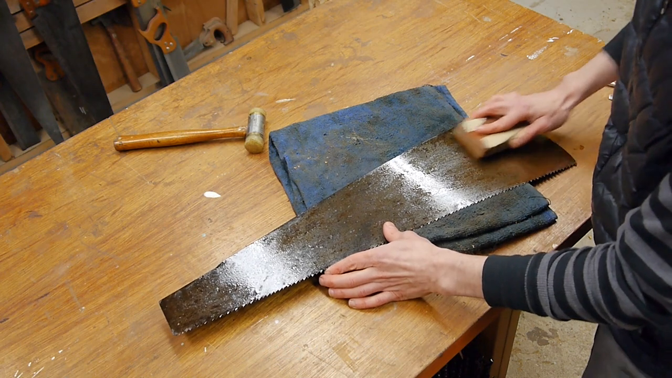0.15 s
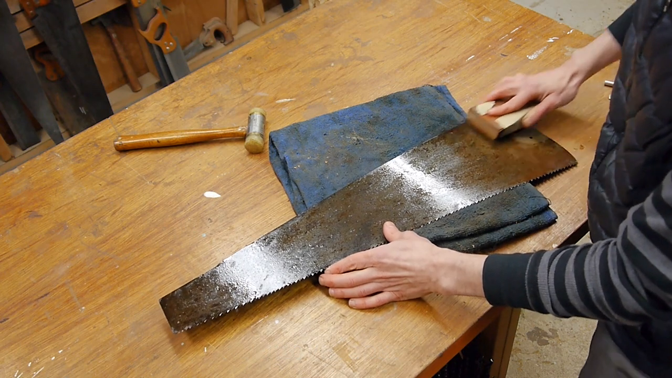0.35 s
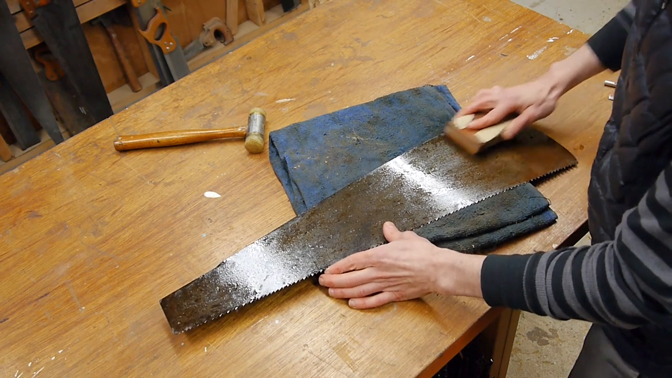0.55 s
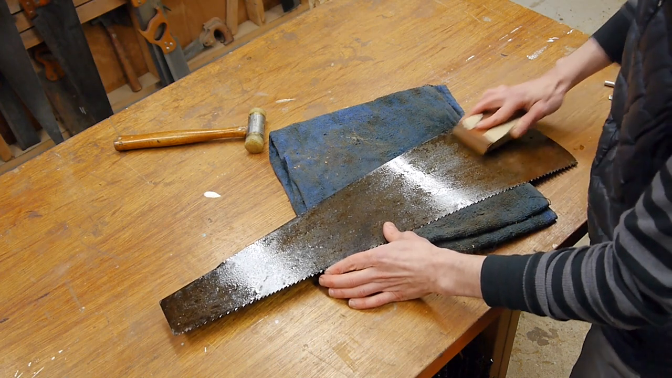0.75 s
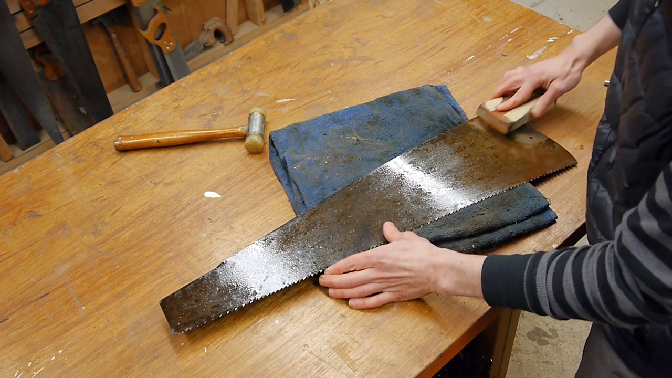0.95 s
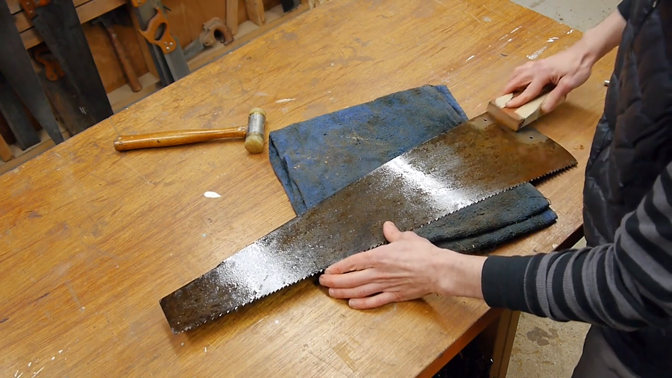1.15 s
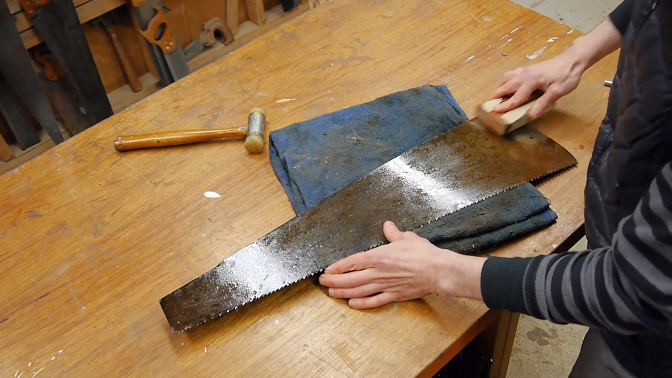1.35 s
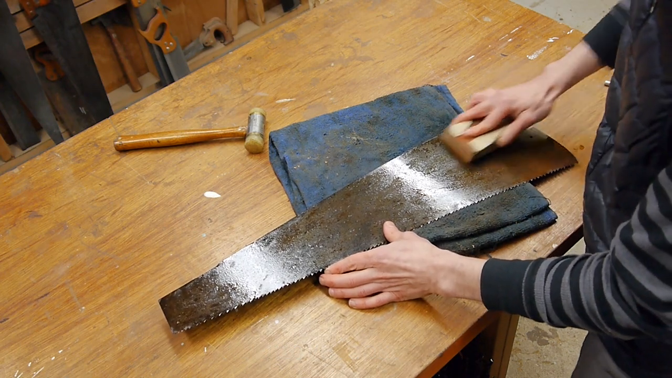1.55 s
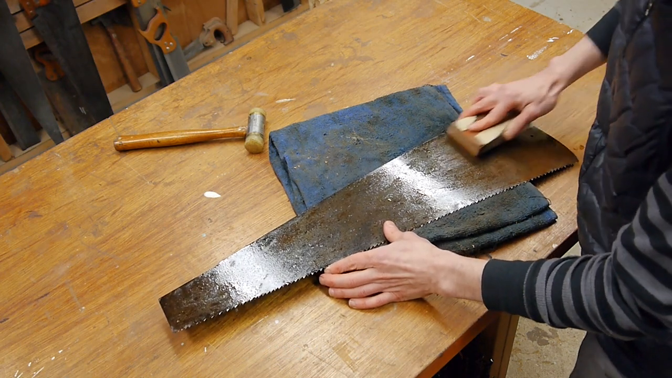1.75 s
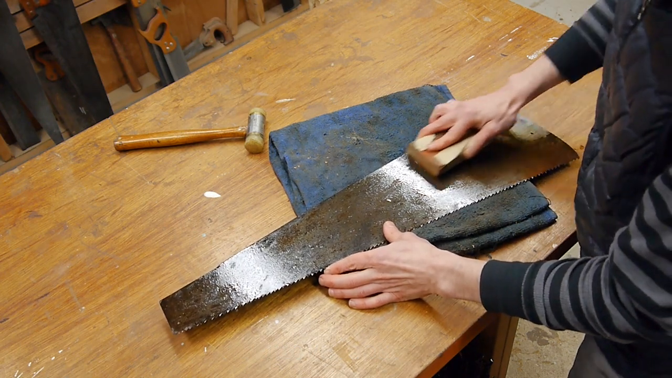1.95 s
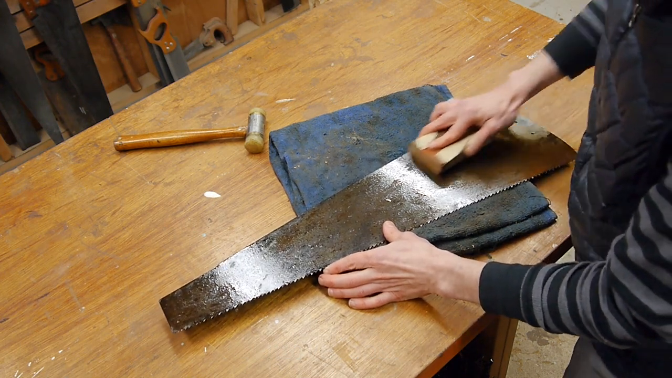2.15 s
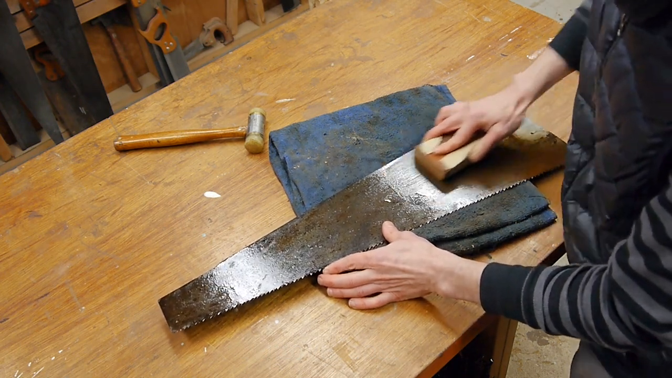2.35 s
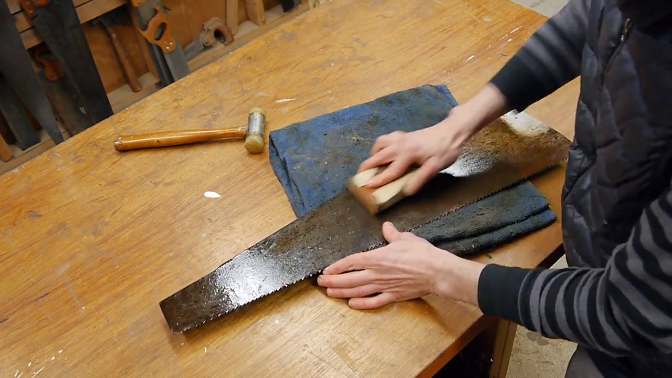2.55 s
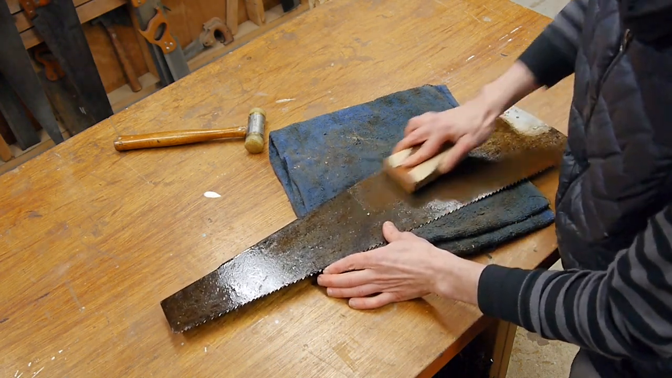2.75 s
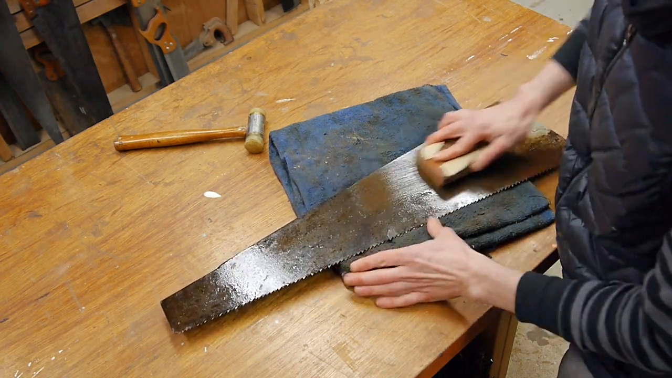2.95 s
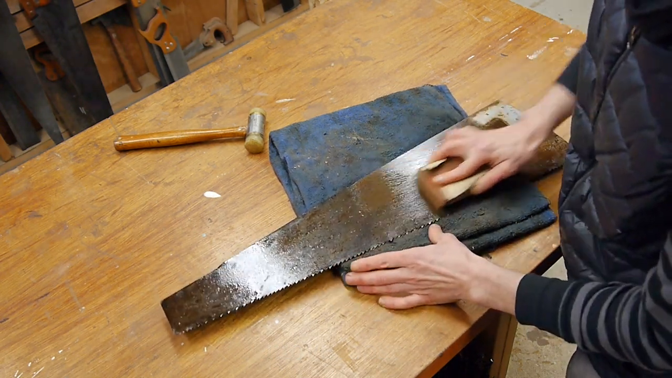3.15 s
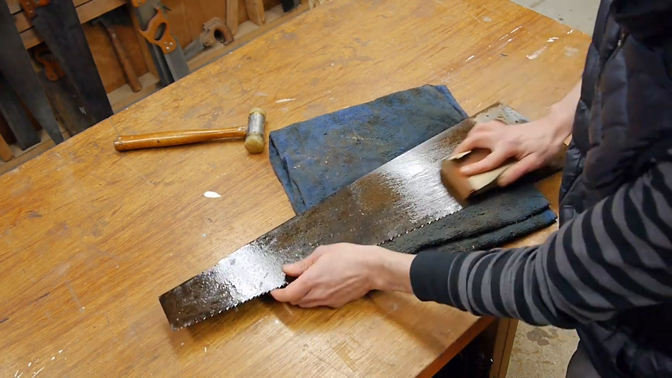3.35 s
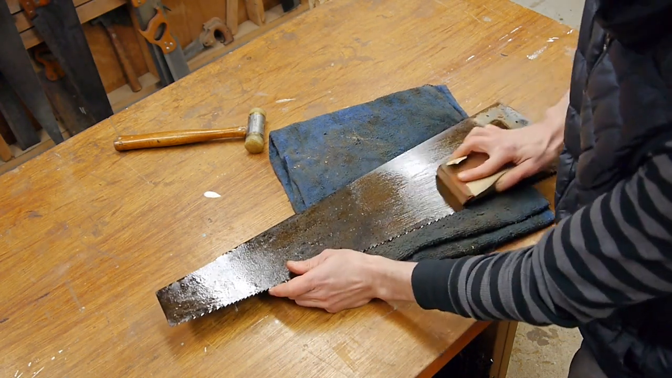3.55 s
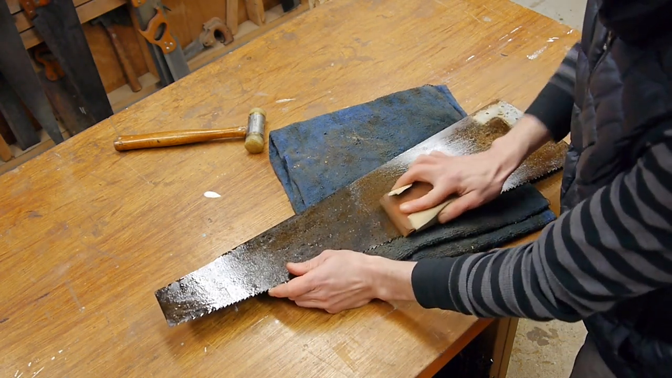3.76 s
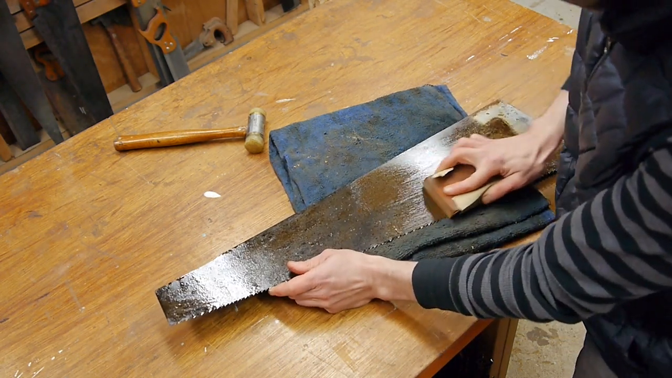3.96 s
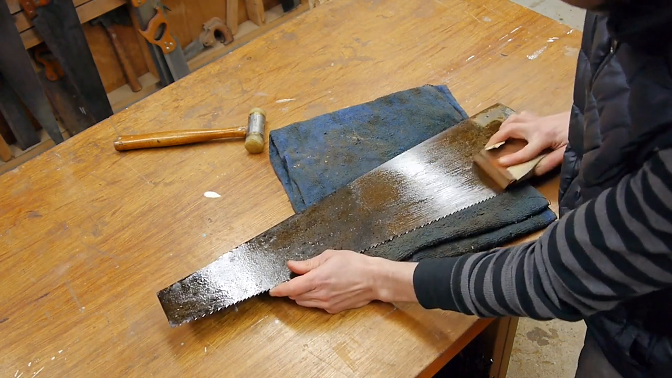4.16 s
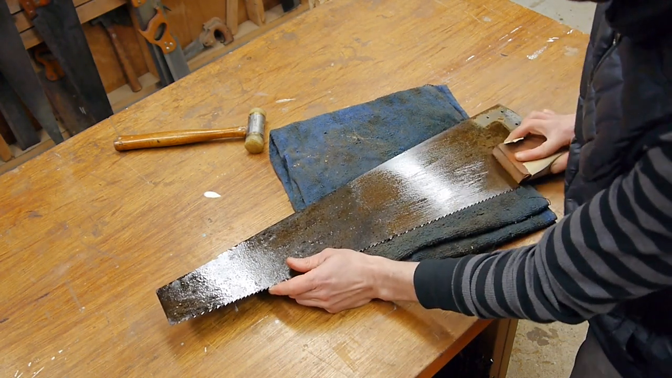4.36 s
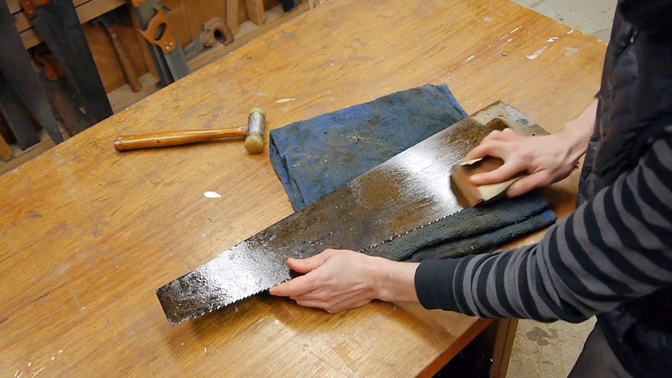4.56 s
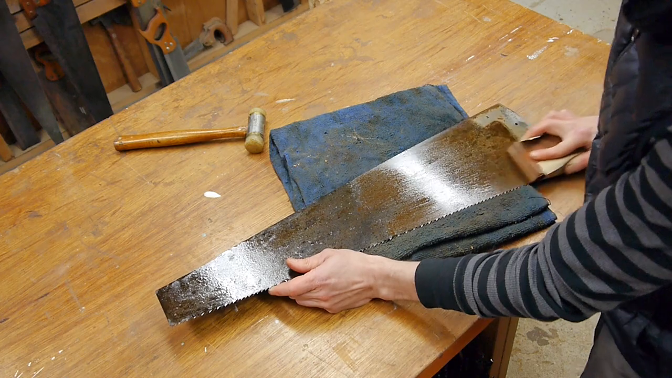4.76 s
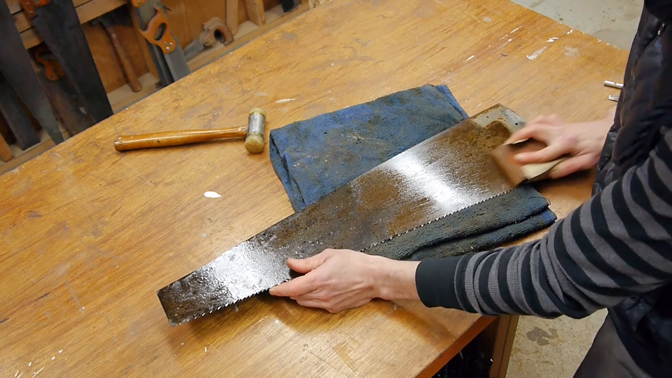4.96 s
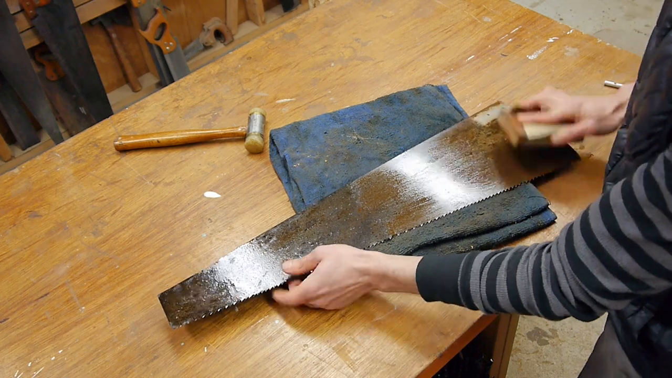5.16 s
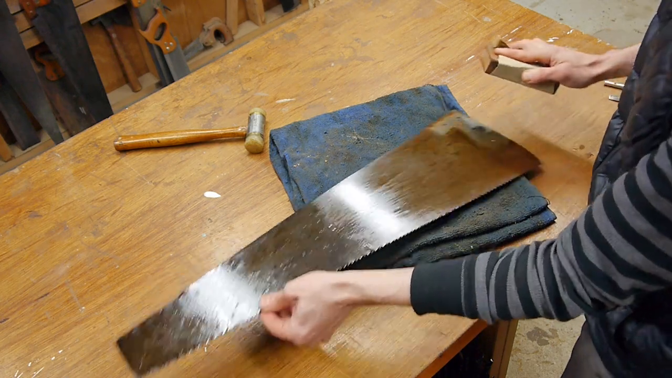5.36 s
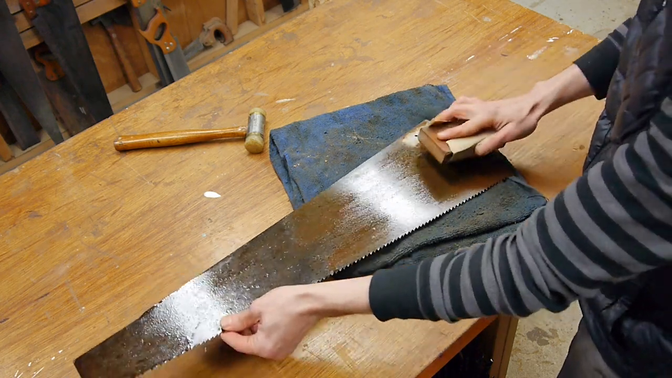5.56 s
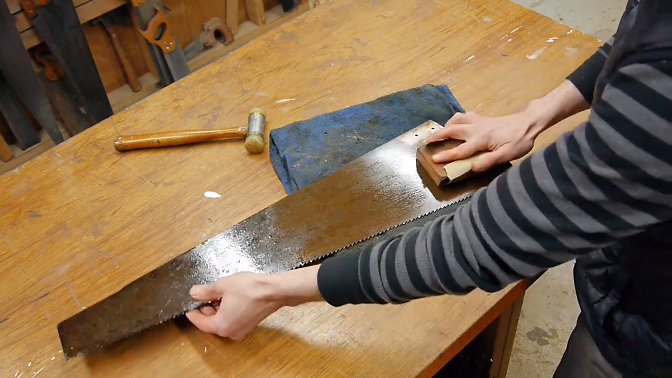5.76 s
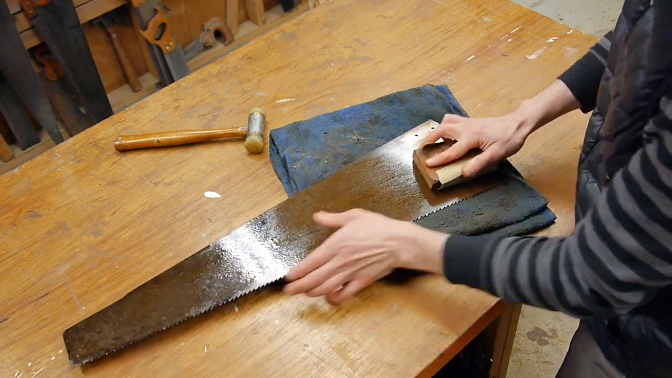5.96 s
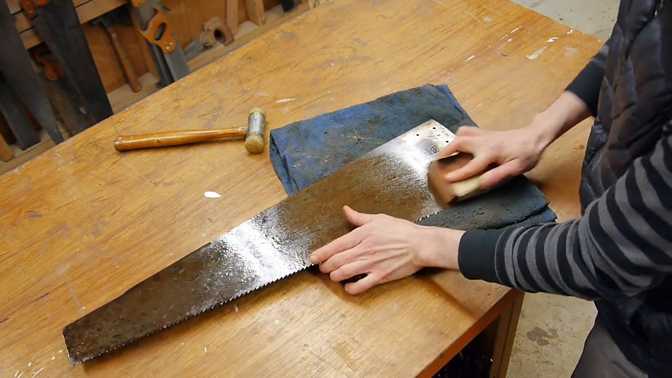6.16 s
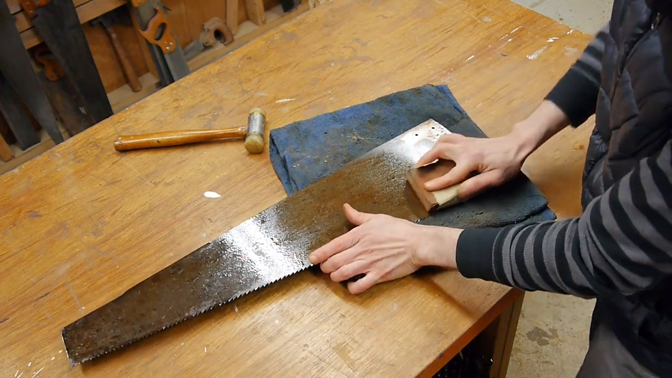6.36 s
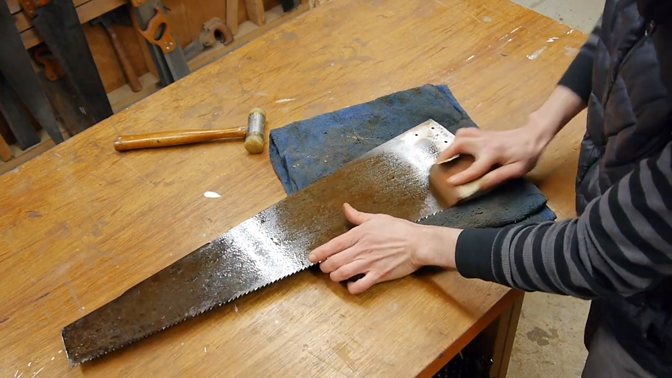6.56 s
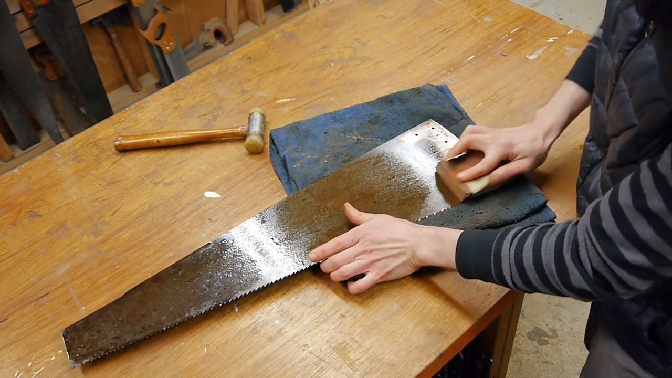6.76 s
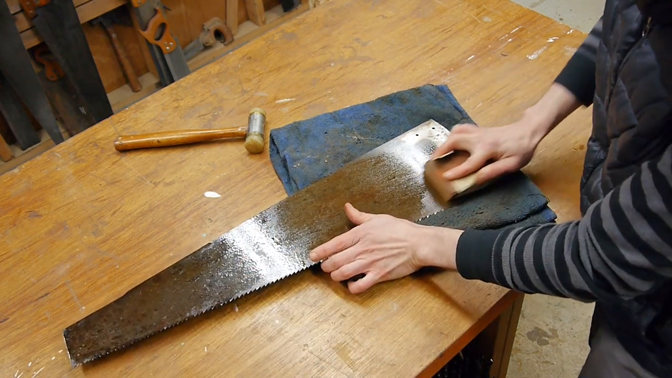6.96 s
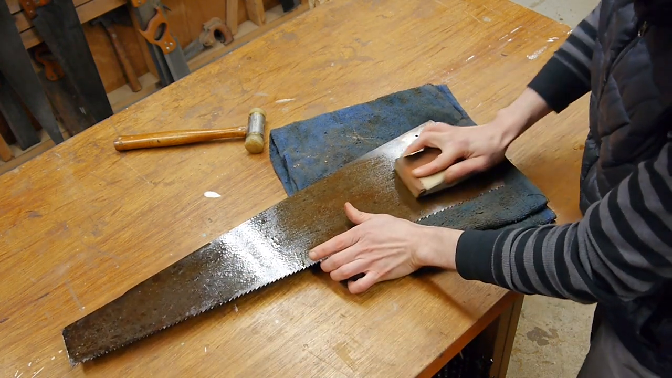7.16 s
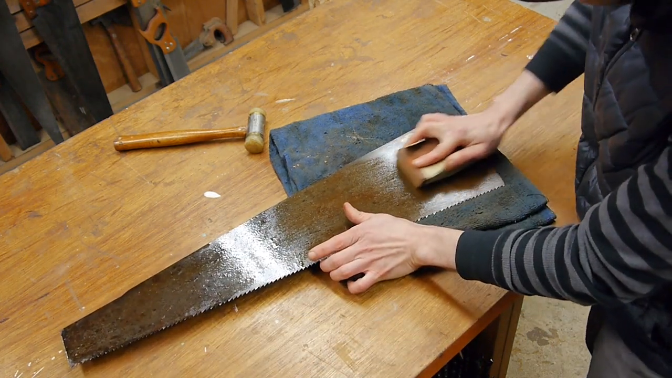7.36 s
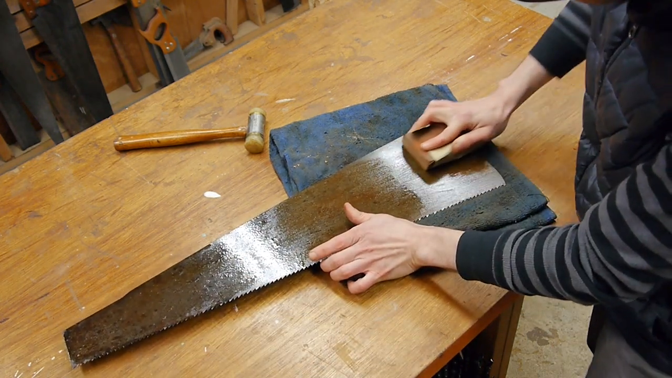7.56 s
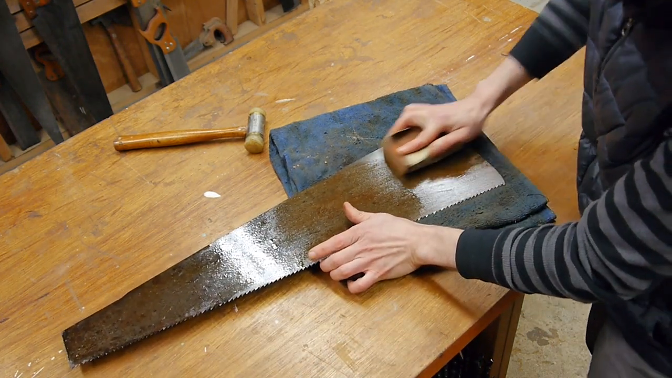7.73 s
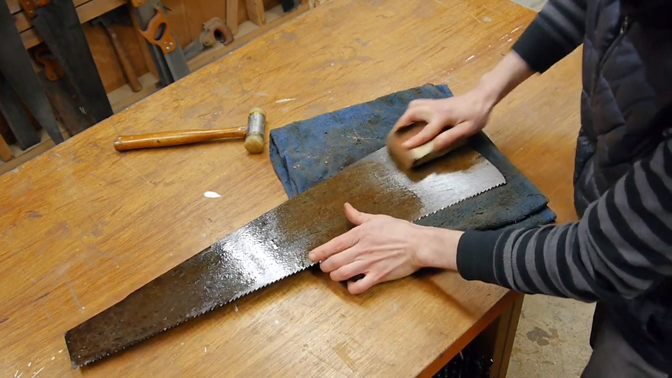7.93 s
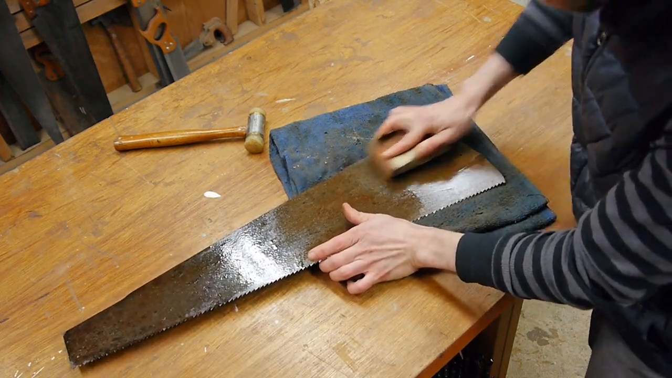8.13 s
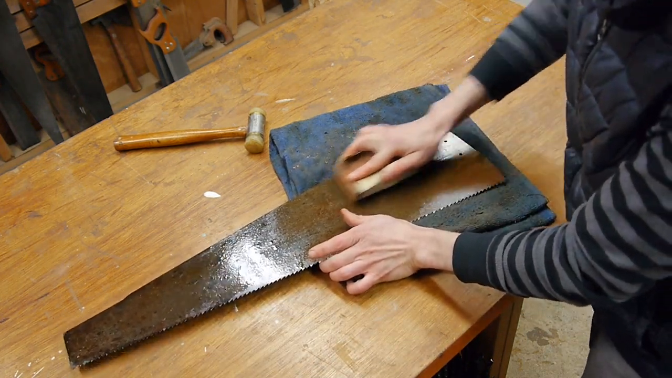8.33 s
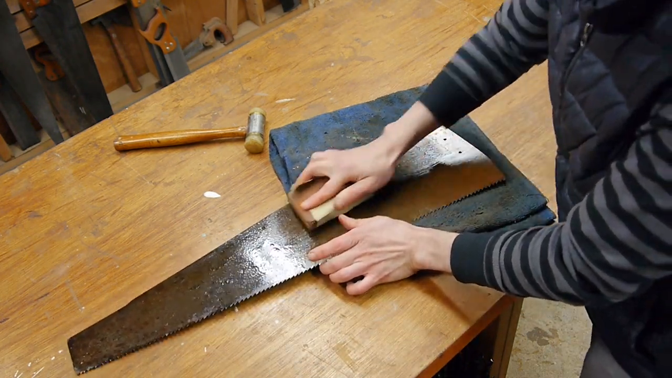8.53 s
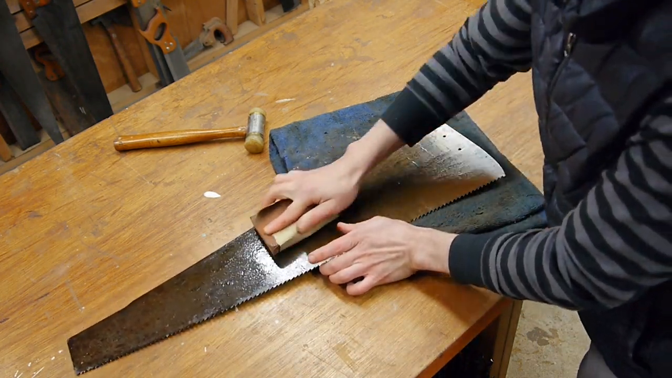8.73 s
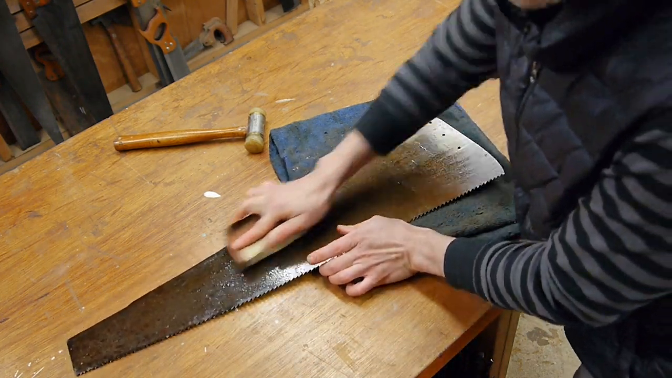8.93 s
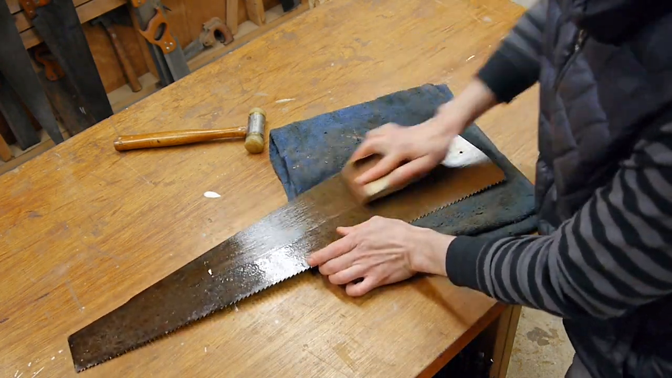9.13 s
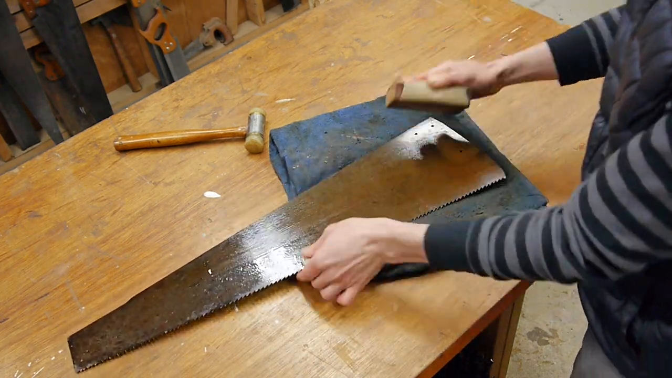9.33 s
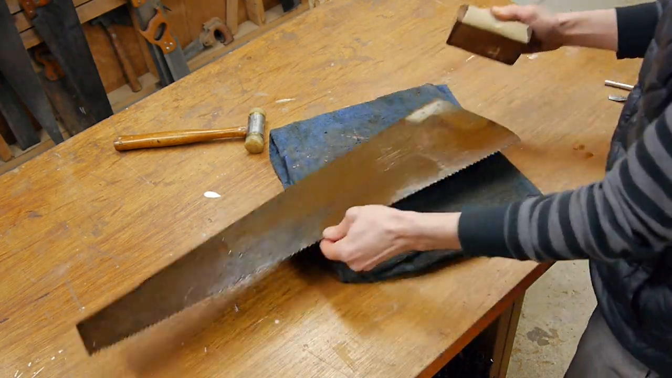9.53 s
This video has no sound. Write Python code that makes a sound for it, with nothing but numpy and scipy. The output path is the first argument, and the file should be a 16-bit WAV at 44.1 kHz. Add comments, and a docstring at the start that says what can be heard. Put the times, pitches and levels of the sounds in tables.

```python
"""First a sanding block rubs to and fro over a steel saw blade on a workbench: noise coloured by grit and
plate, swelling with each stroke. Its knocks ring the wooden bench. In a pause the blade is dragged, chatters
and claps down on the wood, as decaying modes and noise bursts. After two seconds the scene runs at double
pace, in its last moment at triple pace: colours, bench modes and hum move up in step, and the stereo picture
changes. Two channels at the bench also take in a small workshop's answer, air, rumble, hum and whine."""
import sys
import numpy as np
from scipy import signal
from scipy.fft import rfft, irfft, next_fast_len
from scipy.io import wavfile
from scipy.ndimage import uniform_filter1d, map_coordinates

SR = 44100
rng = np.random.default_rng(int(sys.argv[2]) if len(sys.argv) > 2 else 0)


def to_wav(s):
    """Save 16-bit WAV."""
    ch = np.atleast_2d(s).T  # columns
    pcm = np.round(np.clip(ch, -1, 1) * 32767)  # PCM
    wavfile.write(sys.argv[1], SR, pcm.astype(np.int16))


N = 427329

# where the pace rises: double_pace_start_s, triple_pace_start_s
PACE_STARTS = (2.092, 9.595)
# hand strokes, each lasting until the next turn or lift: turn_s, top_level_db, place_of_top (0-1)
STROKES = [(-0.07, -23.5, 0.49), (0.052, -25.5, 0.53), (0.184, -25.5, 0.5), (0.317, -25.5, 0.54),
           (0.471, -26, 0.53), (0.605, -26.5, 0.55), (0.752, -31, 0.5), (0.877, -28.5, 0.57),
           (1.029, -30.0, 0.43), (1.139, -30.5, 0.56), (1.261, -30.0, 0.3), (1.386, -30.5, 0.56),
           (1.506, -33, 0.59), (1.597, -26.5, 0.52), (1.735, -29.5, 0.37), (1.882, -27.0, 0.64),
           (2.021, -29.5, 0.3), (2.14, -34.5, 0.67), (2.209, -36.0, 0.44), (2.274, -29, 0.71),
           (2.351, -32.5, 0.3), (2.416, -28.0, 0.58), (2.504, -30.5, 0.37), (2.577, -28.5, 0.58),
           (2.647, -32.5, 0.4), (2.715, -31, 0.52), (2.781, -33.5, 0.43), (2.85, -31, 0.59),
           (2.925, -32, 0.44), (3.067, -28.5, 0.42), (3.172, -29, 0.37), (3.267, -30, 0.53),
           (3.354, -29, 0.4), (3.451, -29.5, 0.56), (3.545, -28.5, 0.45), (3.629, -28, 0.49),
           (3.708, -27.0, 0.42), (3.78, -29.0, 0.52), (3.841, -29.0, 0.5), (3.905, -28.5, 0.54),
           (3.963, -29.5, 0.51), (4.028, -28.5, 0.5), (4.093, -30.5, 0.22), (4.214, -36.5, 0.74),
           (4.267, -31.5, 0.61), (4.354, -32, 0.35), (4.432, -34.5, 0.52), (4.5, -31.5, 0.45),
           (4.565, -32.5, 0.59), (4.624, -31.0, 0.5), (4.687, -33, 0.43), (4.743, -26.5, 0.54),
           (4.822, -30, 0.4), (4.879, -28.0, 0.55), (4.941, -28.5, 0.49), (5.002, -26.5, 0.53),
           (5.068, -28, 0.43), (5.136, -34.5, 0), (5.956, -44, 0.8), (6.01, -35.5, 0.46),
           (6.074, -30, 0.52), (6.146, -31, 0.56), (6.206, -30.5, 0.53), (6.265, -29.5, 0.55),
           (6.326, -31.5, 0.53), (6.384, -31.5, 0.52), (6.439, -30, 0.49), (6.499, -31, 0.56),
           (6.556, -29, 0.46), (6.612, -32.0, 0.5), (6.667, -30.5, 0.48), (6.72, -33.5, 0.56),
           (6.775, -31.5, 0.53), (6.827, -33.0, 0.52), (6.886, -32.5, 0.49), (6.94, -31.5, 0.51),
           (6.998, -32.5, 0.54), (7.056, -32.5, 0.45), (7.112, -34.5, 0.48), (7.172, -33, 0.38),
           (7.23, -35, 0.5), (7.284, -32, 0.34), (7.342, -34.5, 0.54), (7.399, -32.5, 0.42),
           (7.46, -33, 0.53), (7.52, -33, 0.4), (7.584, -33, 0.49), (7.647, -32.5, 0.43),
           (7.706, -32.5, 0.5), (7.768, -33, 0.45), (7.83, -32.5, 0.54), (7.891, -31.5, 0.53),
           (7.954, -31, 0.49), (8.021, -31, 0.45), (8.091, -30.5, 0.5), (8.164, -29.5, 0.52),
           (8.267, -32.0, 0.5), (8.359, -30.5, 0.54), (8.444, -30.5, 0.43), (8.525, -30.5, 0.56),
           (8.614, -29, 0.5), (8.692, -29, 0.56), (8.804, -28.5, 0.47), (8.903, -26, 0.57),
           (9.066, -27.5, 0.22)]
# the block leaves the blade: lift_s
LIFTS = (5.225, 9.285)
# colour along the blade: time_s, low_ring_over_strokes_db, treble_over_strokes_db
BLADE_COLOUR = [(0, -11.5, -7), (.7, -11.5, -4.5), (1.2, -9.5, -4.5), (2.08, -10.5, -2.5), (2.12, -8, 1),
                (2.95, -8, -0.5), (3.15, -10, 6), (3.55, -11, 3), (3.95, -8.5, -2), (4.3, -9, 6),
                (4.65, -5, 1), (5, -9.5, 2.5), (5.2, -6, -2), (6, -8, 0), (6.75, -7.5, 0.5), (7.3, -9.5, 2),
                (7.95, -11, -1.5), (8.5, -11.5, 1), (8.9, -12, 0), (9.1, -8.5, -0.5), (9.25, -17, 1)]
# sandpaper on steel, at natural pace: pitch_hz, level_db (per Hz)
GRIT = [(24, -57), (40, -24), (54, -52.5), (98, -28.5), (219, -18.5), (379, -8), (452, -12.5), (625, -5.5),
        (1080, -8.5), (4180, -7), (4500, -6), (5230, -4.5), (9520, 4.5), (13500, -3), (15700, -13.5)]
# resonances of the rubbed blade, at double pace: pitch_hz, width_hz, level_db
PLATE = [(527, 37, 0.5), (775, 18, -10), (1284, 31, -4.5), (1895, 97, 0), (2472, 150, -2.5),
         (3170, 160, -7.5), (4630, 76, 2.5), (5820, 620, -6.5), (7000, 130, -2), (7860, 250, -7),
         (8270, 260, 0), (9410, 160, -6.5), (10240, 570, -1.5), (11500, 170, -5)]
# stereo picture at natural pace: heard_pitch_hz, left_right_likeness (0-1)
LIKENESS_NATURAL = [(60, 0.85), (130, 0.59), (290, 0.85), (640, 0.9), (1410, 0.65), (3100, 0.66),
                    (6820, 0.96), (15000, 1)]
# stereo picture at the faster paces: heard_pitch_hz, left_right_likeness (0-1)
LIKENESS_FAST = [(60, 0.4), (130, 0.64), (290, 0.8), (640, 0.9), (1410, 0.94), (3100, 0.8), (6820, 0.69),
                 (15000, 0.88)]
# balance of the rubbing: time_s, left_over_right_db
BALANCE = [(0.0, 0.0), (1.97, 0.0), (3.31, 0), (5.05, 0.0), (8.13, 0), (9.12, 0.5), (9.3, -0.5)]
# the block rocks and knocks the bench: start_s, mode_level_db, deep_part_db, bright_part_db, tick_level_db
KNOCKS = [(.061, -48, 21, 0, -48), (.085, -46, 16, -6, -50), (.115, -49, 18, -8, -51),
          (.414, -48, -8, 2, -47), (.471, -41, -5, 0, -52), (.67, -46, -8, -4, -47.5),
          (.754, -39.5, 2, -2, -50), (.903, -46, -12, -4, -50), (1.227, -48, -7, -7, -47),
          (5.919, -59, -8, 25, -32), (5.964, -66, -6, 14, -41), (8.202, -66, -4, 10, -31),
          (8.273, -38, -1, 4, -36), (8.444, -33.5, 0, 7, -35), (8.594, -31, -2, 4.5, -38),
          (9.309, -61, -6, 6, -50)]
# wooden bench modes, at natural pace: pitch_hz, level_db, t60_s
BENCH_MODES = [(104, -8, 0.14), (196, -7, 0.097), (283, -1, 0.052), (345, 2, .04), (385, -1, 0.058),
               (676, -3, 0.045), (924, 0, .036), (1010, -8, .04), (1275, -14, .03)]
# the blade brushes its cloth while moved or lifted, one list a spell: time_s, scrape_db, hiss_db
SHIFTING = [
    [(5.2, -67, -68), (5.28, -74, -76), (5.34, -63, -68), (5.4, -64, -69), (5.44, -62.5, -65.5),
     (5.463, -55, -55.5)],
    [(5.62, -70, -71), (5.7, -62, -70), (5.74, -57, -54), (5.79, -48, -52.5), (5.82, -54, -47.5),
     (5.855, -49, -50), (5.9, -78, -67), (5.95, -70, -60)],
    [(9.24, -62, -61), (9.29, -51, -65), (9.31, -51.5, -55.5), (9.345, -65, -71), (9.41, -58, -70.5),
     (9.45, -71, -70.5), (9.49, -67.5, -66), (9.53, -68, -71.5), (9.69, -78, -75)],
]
# colour of that scrape: pitch_hz, level_db (per Hz)
SCRAPE_COLOUR = [(300, -37), (560, 0.5), (900, -7.5), (1380, 3), (1550, -6), (1830, -2), (2300, -5.5),
                 (4500, -12), (8000, -38)]
# the loose blade strikes the wood: start_s, ring_db, damping (1 = free), clap_db, contact_edge_hz, crack_db
BLOWS = [(5.465, -43, 3, -24.5, 2900, -26), (5.468, -33, 2.6, -23, 2830, -41),
         (5.4842, -24.5, 1.4, -29, 2920, -31.5), (5.489, -26.5, 1.8, -36, 2900, -39.5),
         (5.501, -28.5, 2.5, -26, 2920, -34.5), (5.523, -28, 2, -34, 2900, -30),
         (5.539, -22.5, 2.6, -25.5, 4000, -30.5), (5.5413, -19.5, 2.6, -4, 9000, -20)]
# modes of the struck blade, as heard: pitch_hz, level_db, t60_s (when free)
BLADE_MODES = [(226, -11.5, .1), (548, -5, 0.15), (640, -1.5, 0.15), (703, -5, 0.15), (990, -8.5, 0.056),
               (1054, 6.5, 0.2), (1385, -4, 0.1), (1750, -6.5, .08), (1630, -6, 0.072), (1950, -10, .08),
               (6340, -18.5, 0.16)]
# the flat of the blade on wood: pitch_hz, level_db (per Hz)
CLAP_COLOUR = [(120, -40.5), (200, -36.5), (580, -9), (850, -12), (1100, -3), (1600, 0.5), (2500, -7.5),
               (3500, -11), (7000, -31), (15700, -41)]
# rattle of the dragged blade: time_s, level_db
CHATTER = [(5.464, -32), (5.482, -37), (5.49, -25.5), (5.511, -25.5), (5.518, -40), (5.527, -32),
           (5.538, -37)]
# room air, at double pace: pitch_hz, level_db (per Hz)
AIR_COLOUR = [(12, -18), (20, 12.5), (33, -22), (74, -24), (130, -24.5), (181, -19.5), (214, -3),
              (239, -12), (364, -21.5), (1240, -15), (1510, -28), (4480, -28), (15700, -32.5)]
# low rumble: time_s, level_db
RUMBLE = [(0, -70), (.4, -76), (1.1, -69), (2, -67), (5.8, -69), (6.2, -65), (8.6, -65), (9.3, -68),
          (9.45, -78.5), (9.69, -80.5)]
# machine hum, at natural pace: pitch_hz, level_db
HUM = (105, -67.5)
# the workshop's dying answer: pitch_hz, t60_s
SHOP_DECAY = [(200, .28), (1000, 0.23), (4000, 0.22), (12000, 0.15)]

# share of a stroke's extra level over its neighbours that reaches the low ring and the treble
BODY_FOLLOWS, SHEEN_FOLLOWS = 0.37, 0.5
# rubbing left at a turn, under the strokes beside it; less before a long stroke (s at natural pace)
TURN_DB, TURN_DB_PER_S = -6, -43
GRAZE_SHEEN_DB = 1.5  # treble over the hiss while the blade is shifted
AIR_DB = -63
WHINE_HZ, WHINE_DB = 712, -71.5  # pitch at natural pace
TOP_HZ, OFFSET = 15760, -0.0031  # band limit; steady offset, of full scale

T = np.arange(N) / SR
PACE = 1 + (T > PACE_STARTS[0]) + (T > PACE_STARTS[1])


def amp(db):
    """Amplitude of a level in dB."""
    return 10 ** (np.asarray(db) / 20)


def unit(x):
    """Scale to rms 1."""
    return x / np.sqrt(np.mean(x ** 2) + 1e-20)


def along(points, hz):
    """Read (pitch_hz, value) points on a log pitch axis."""
    pitch, value = np.transpose(points)
    return np.interp(np.log(hz + 1), np.log(pitch + 1), value)


def curve(rows):
    """Read (time_s, value) rows at every sample."""
    return np.interp(T, *np.transpose(rows))


def wobble(rate):
    """A smooth random curve, rate knots a second."""
    knots = rng.standard_normal(int(N * rate / SR) + 4)
    return map_coordinates(knots, [T * rate])


def filtered(x, response):
    """x shaped by a complex response of frequency."""
    m = next_fast_len(N + SR // 2)
    return irfft(rfft(x, m) * response(np.fft.rfftfreq(m, 1 / SR)), m)[..., :N]


def below(hz, edge_hz):
    """A smooth step from 1 down to 0."""
    return 1 / (1 + (hz / edge_hz) ** 6)


def paced(pair, colour, band):
    """Stereo noise of rms 1 at each pace: its colour moves up with the pace, its band stays put."""
    takes = []
    for pace in range(1, 4):
        likeness = LIKENESS_NATURAL if pace == 1 else LIKENESS_FAST

        def mid_side(hz):
            turn = np.arccos(np.clip(along(likeness, hz), 0, 1)) / 2
            return colour(hz / pace) * band(hz) * np.array([np.cos(turn), np.sin(turn)])

        mid, side = filtered(pair, mid_side)
        takes.append(unit(np.array([mid + side, mid - side])))
    return np.choose(PACE - 1, takes)


def ring(modes, damping, spread_db):
    """One blow on a set of modes: decaying sines of randomly varied strength."""
    t = np.arange(SR // 2) / SR
    total = 0
    for hz, db, t60 in modes:
        level_db = db + rng.normal(0, spread_db) - 60 * t * damping / t60
        total = total + amp(level_db) * np.sin(2 * np.pi * hz * t)
    return total


def moved(column):
    """Gain from one column of the shifting lists, silent outside them."""
    level = 0
    for rows in SHIFTING:
        inside = (T > rows[0][0]) * (T < rows[-1][0])
        level = level + amp(curve(np.array(rows)[:, [0, column]])) * inside
    return uniform_filter1d(level, size=400)


def hand():
    """Gains of hiss, low ring and treble: the hand is fastest inside a stroke and all but stops at turns."""
    start, top_db, place = np.transpose(STROKES)
    ends = np.array([min(e for e in [*start, *LIFTS] if e > s) for s in start])
    usual_db = uniform_filter1d(top_db, size=3)
    extra_db = top_db - usual_db
    k = np.searchsorted(start, T, "right") - 1  # stroke under way
    u = np.clip((T - start[k]) / (ends[k] - start[k]), 0, 1)
    # bend time so the half-sine peaks at the stroke's own place
    bend = np.log(0.5) / np.log(np.clip(place[k], 0.1, 0.9))
    speed = np.abs(np.sin(np.pi * u ** bend)) ** 1.07

    natural_length = (ends - start) * PACE[np.round(ends * SR).astype(int)]
    turn_db = (top_db[1:] + top_db[:-1]) / 2 + TURN_DB
    turn_db = turn_db + TURN_DB_PER_S * np.minimum(natural_length[1:], 0.25)
    rest = amp(np.interp(T, start[1:], turn_db) - top_db[k])
    rest *= np.where(np.isin(ends, LIFTS)[k], 1 - u, 1)  # a lifting block leaves nothing behind
    swell = rest + (1 - rest) * speed

    at, body_db, sheen_db = np.transpose(BLADE_COLOUR)
    body_db = np.interp(T, at, body_db) + (usual_db + BODY_FOLLOWS * extra_db)[k]
    sheen_db = np.interp(T, at, sheen_db) + (usual_db + SHEEN_FOLLOWS * extra_db)[k]
    hiss = amp(top_db[k]) * swell
    # the heavy plate rings on through a turn, so its dips are shallower
    body = amp(body_db) * swell ** 0.42
    sheen = amp(sheen_db) * swell
    graze = moved(column=2)
    return (uniform_filter1d(hiss, size=200) + graze,
            uniform_filter1d(body, size=700),
            uniform_filter1d(sheen, size=200) + amp(GRAZE_SHEEN_DB) * graze)


def patchy(pair, depth_db):
    """The colour shifts as the block travels along the blade: slow random gain over pitch and time."""
    z = signal.stft(pair, nperseg=512)[2]
    field = uniform_filter1d(rng.standard_normal(z.shape[1:]), size=3, axis=0)
    field = uniform_filter1d(field, size=14, axis=1)
    return signal.istft(z * amp(depth_db * unit(field)), nperseg=512)[1][:, :N]


def plate(hz):
    """The colour of rubbing at natural pace: grit spectrum, lifted at the plate's resonances."""
    peaks = sum(amp(db) / (1 + ((2 * hz - centre) / width * 2) ** 2) for centre, width, db in PLATE)
    return amp(along(GRIT, hz)) * (1 + 0.93 * peaks)


def sanding():
    """Grit bites excite the plate under the moving hand, in three bands with their own gains."""
    hiss, body, sheen = hand()
    # bites of uneven size, and rough spots on the rust
    roughness = amp(0.94 * wobble(900) + 1.07 * wobble(60))
    bites = patchy(rng.standard_normal((2, N)), depth_db=1.25) * roughness

    def treble(hz):
        tilt = amp(-4 * np.log2(hz / 11000 + 0.0012))  # about -4 dB an octave
        return (1 - below(hz, 11470)) * (hz < TOP_HZ) * tilt

    low = paced(bites, plate, lambda hz: below(hz, 2955))
    middle = paced(bites, plate, lambda hz: below(hz, 10200) - below(hz, 2815))
    high = paced(bites, plate, treble)
    # at first the block works at the blade's end and shakes the bench
    shake = unit(filtered(bites[0], lambda hz: (below(hz, 440) - below(hz, 125)) / plate(hz)))
    bench = amp(-27 - 2.9 * T + 3.3 * wobble(10.3)) * (PACE == 1) * shake
    rub = body * amp(1.25 * wobble(25)) * (low + bench) + hiss * middle + sheen * high
    return rub * amp(np.outer([0.5, -0.5], curve(BALANCE)))


def room_tone():
    """Air and low rumble as filtered noise; a wavering machine hum and a faint thin whine as sines."""
    air = paced(rng.standard_normal((2, N)), lambda hz: amp(along(AIR_COLOUR, 2 * hz)),
                lambda hz: 1 - below(hz, 70))
    rumble = unit(filtered(rng.standard_normal((2, N)), lambda hz: below(hz, 55) * (1 - below(hz, 17))))
    hum_hz, hum_db = HUM
    hum_pitch = hum_hz * PACE * (1 + 0.012 * wobble(29))
    hum = amp(hum_db + 1.6 * wobble(14)) * np.sin(2 * np.pi * np.cumsum(hum_pitch) / SR)
    whine_pitch = WHINE_HZ * PACE * (1 + 0.0015 * wobble(26))
    whine = amp(WHINE_DB + 3 * wobble(12)) * np.sin(2 * np.pi * np.cumsum(whine_pitch) / SR)
    return amp(AIR_DB) * air + amp(curve(RUMBLE)) * rumble + hum + whine


def shop(x):
    """The room's answer: decaying noise, each pitch at its own speed; the channels differ in the treble."""
    hz, t, z = signal.stft(rng.standard_normal((2, SR // 2)), SR, nperseg=256)
    z[1] *= amp(-2.5) * (1 - 0.94 * below(hz, 1600))[:, None]
    decay = amp(-60 * t / along(SHOP_DECAY, hz)[:, None])
    mid, side = signal.istft(z * decay, SR, nperseg=256)[1]
    tail = np.array([mid + side, mid - side]) / np.linalg.norm(mid)
    delayed = np.pad(x, (60, 0))  # samples before the room answers
    return signal.fftconvolve(delayed[None], tail, axes=1)[:, :N]


def knocks():
    """Wooden contacts: the bench modes and a short noise tick."""
    out, t = np.zeros(N + SR), np.arange(SR // 2) / SR
    for start, db, deep_db, bright_db, tick_db in KNOCKS:
        pace = PACE[round(start * SR)]
        modes = []
        for natural_hz, level, t60 in BENCH_MODES:
            hz = natural_hz * pace
            modes.append((hz, level + deep_db * (hz < 260) + bright_db * (hz > 1000), t60))
        wood = amp(db) * ring(modes, pace, spread_db=5) * (1 - np.exp(-t / 0.00058))
        tick = amp(tick_db - 60 * t / 0.012) * rng.standard_normal(len(t))
        out[round(start * SR):][:len(t)] += wood + tick
    return out[:N]


def shifting():
    """Faint scraping while the blade is moved or lifted: coloured noise of uneven level."""
    scrape = unit(filtered(rng.standard_normal(N), lambda hz: amp(along(SCRAPE_COLOUR, hz))))
    return moved(column=1) * amp(2.2 * wobble(30)) * scrape


def blade():
    """Each blow rings the steel, claps and cracks; dragging rattles it in between."""
    out, t = np.zeros(N + SR), np.arange(SR // 2) / SR

    def on_wood(noise, contact_hz):
        return filtered(noise, lambda hz: amp(along(CLAP_COLOUR, hz)) * below(hz, contact_hz))

    for start, ring_db, damping, clap_db, contact_hz, crack_db in BLOWS:
        slap = unit(on_wood(rng.standard_normal(len(t)), contact_hz)[:len(t)])
        # a sharp front, then the many unresolved modes of blade and bench
        fall = amp(-60 * t / 0.011) + 0.5 * amp(-60 * t / 0.13)
        clap = amp(clap_db) * slap * fall * (1 - np.exp(-t / 0.00021))
        crack = amp(crack_db - 60 * t / 0.017) * np.diff(rng.standard_normal(len(t) + 1))
        steel = ring(BLADE_MODES, max(damping, 1), spread_db=4) * (1 - np.exp(-t / 0.0004))
        out[round(start * SR):][:len(t)] += amp(ring_db) * steel + clap + crack

    drag = amp(curve(CHATTER)) * (T > CHATTER[0][0]) * (T < CHATTER[-1][0])
    rattle = signal.fftconvolve(rng.standard_normal(N), ring(BLADE_MODES, 2, spread_db=1))[:N]
    wood = on_wood(rng.standard_normal(N), 3300)
    return out[:N] + drag * (unit(rattle) + amp(-5) * unit(wood))


def scene():
    """Rubbing and contacts at the bench, each with the workshop's answer, over the room tone."""
    rub = sanding()

    def small_source(hz):  # small things give off little bass
        return (-hz ** 2 / (170 ** 2 - hz ** 2 + 200j * hz)) ** 2

    hits = filtered(knocks() + shifting() + blade(), small_source)
    answer = amp(-11) * shop(rub.mean(axis=0)) + amp(-5.5) * shop(hits)
    return rub + hits + answer + room_tone()


def record(dry):
    """Peaks are rounded off; nothing passes above the band limit; a small steady offset is added."""
    soft = dry / (1 + np.abs(dry) ** 6) ** (1 / 6)
    return filtered(soft, lambda hz: hz < TOP_HZ) + OFFSET


dry = scene()
out = record(dry)
to_wav(out)
```